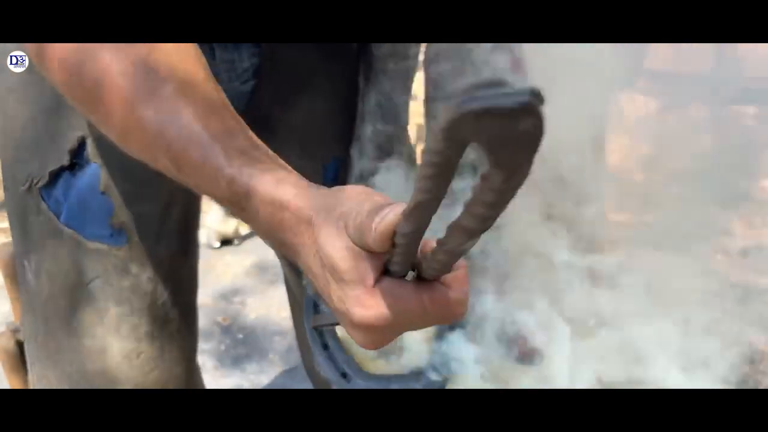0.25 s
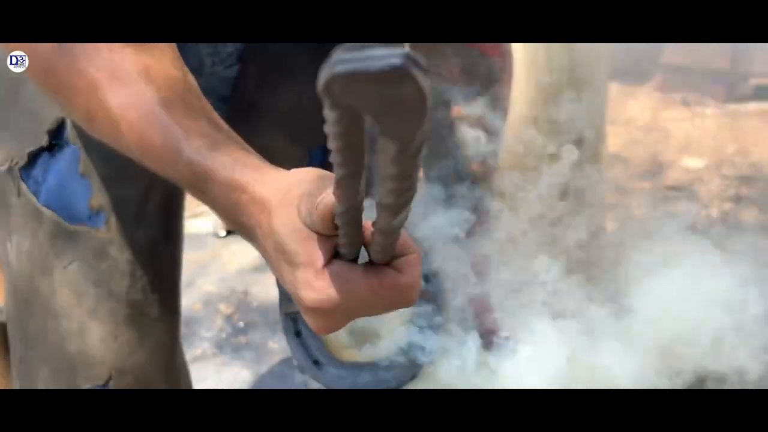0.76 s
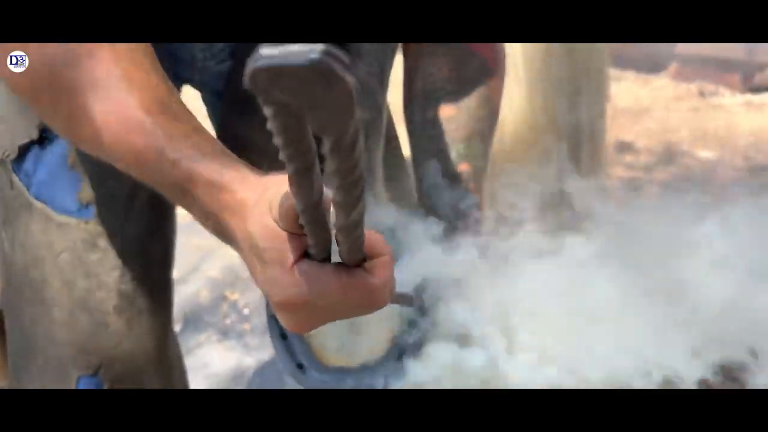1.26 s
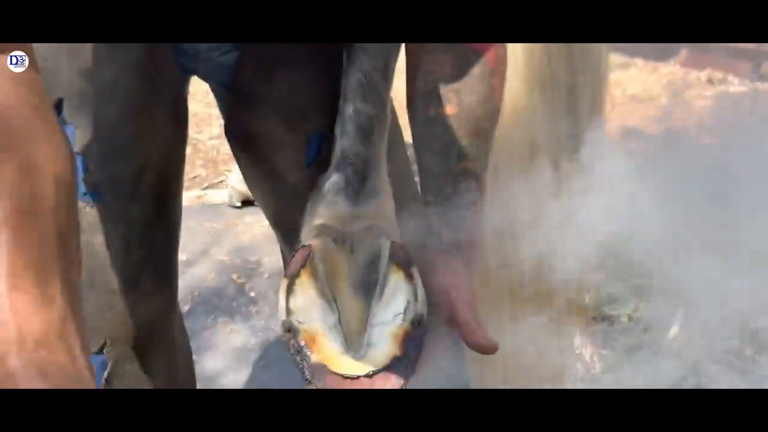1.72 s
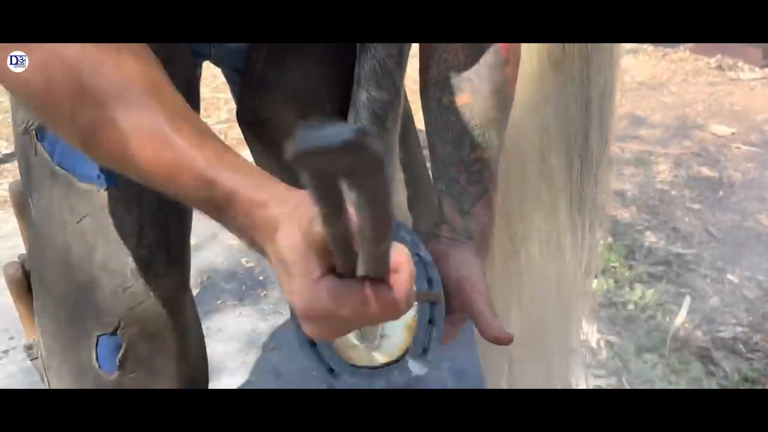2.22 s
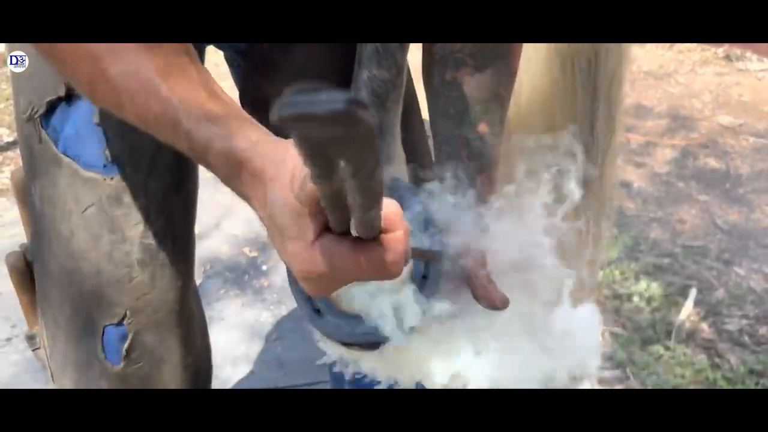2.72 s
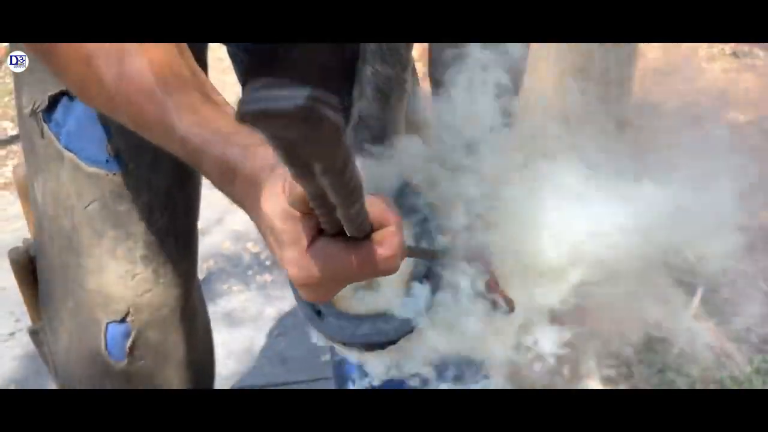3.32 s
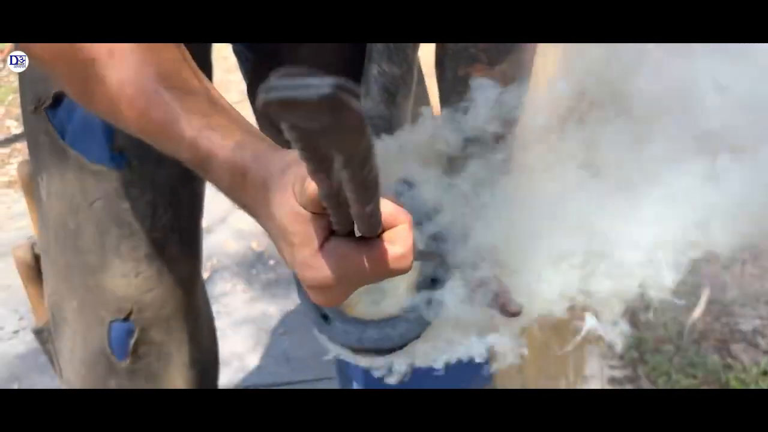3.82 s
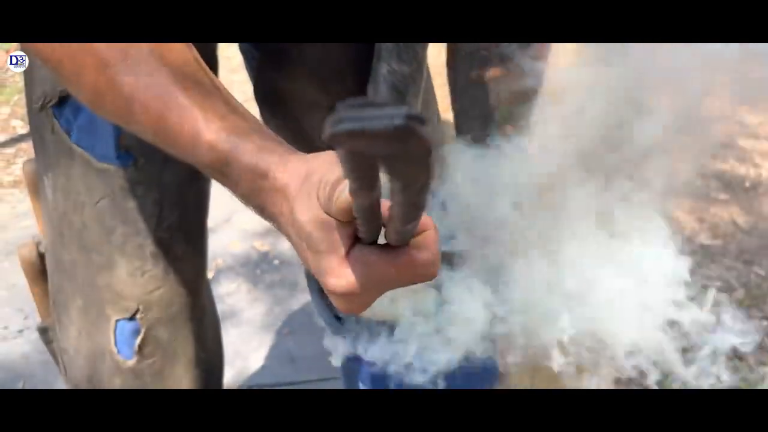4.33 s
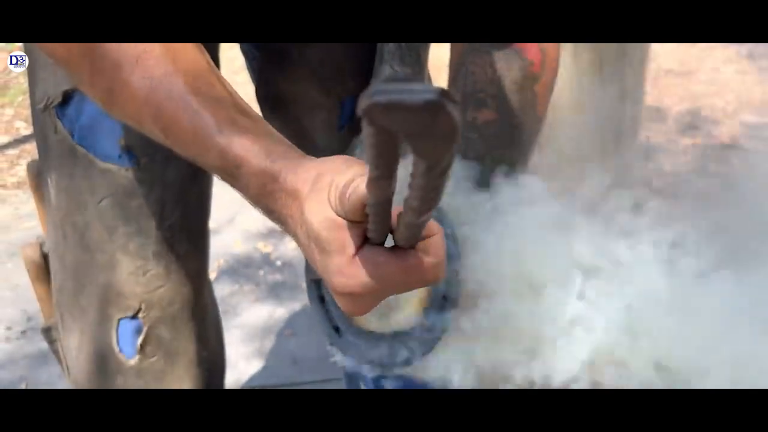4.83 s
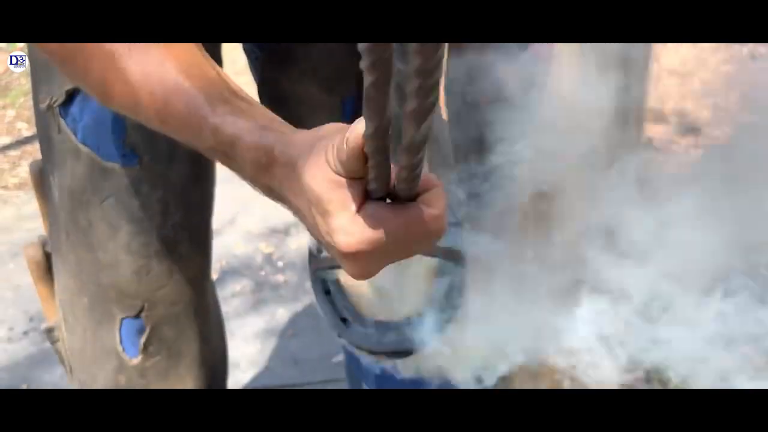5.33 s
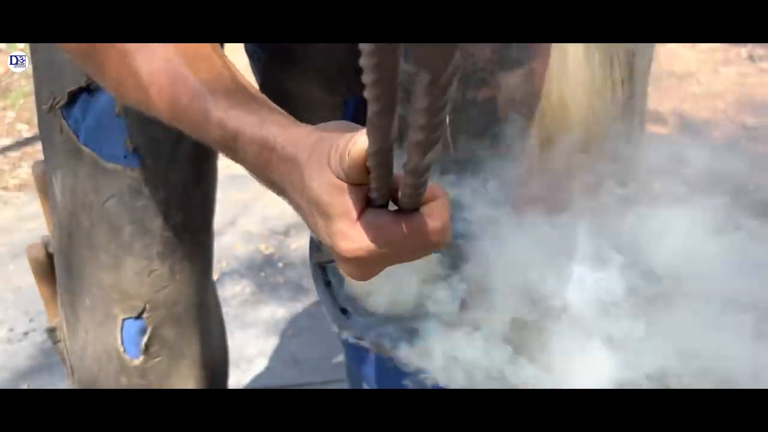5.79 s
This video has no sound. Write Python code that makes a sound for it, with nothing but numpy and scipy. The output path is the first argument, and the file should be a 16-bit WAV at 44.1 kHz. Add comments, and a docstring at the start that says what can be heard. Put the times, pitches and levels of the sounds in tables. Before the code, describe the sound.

A close stereo microphone in an open yard catches a red-hot shoe searing a hoof. First comes a short thud with a faint ring of steel, then a rising, airy sizzle that stops after about a second and a half. Small snaps fill the gap. A second footfall and a hard crack precede a stronger, sustained hiss with occasional pops, fading quickly at the end. A distant engine-like drone wavers quietly below.

```python
"""Outdoors, over a low distant rumble, a horse sets a foot down and a red-hot shoe is pressed on its hoof.
Moisture in the horn boils out in countless tiny random bursts, coloured into a bright hiss and a frying body.
The sizzle swells with contact and thins into single pops, noisy snaps, when the shoe is eased off.
A second, longer press follows, with two more footfalls: falling thuds, gritty scrapes and ringing steel.
The rumble is coloured noise with a wavering two-note drone."""
import sys
import numpy as np
from scipy import signal
from scipy.fft import rfft, irfft, next_fast_len
from scipy.io import wavfile
from scipy.ndimage import uniform_filter1d, map_coordinates

SR = 44100
rng = np.random.default_rng(int(sys.argv[2]) if len(sys.argv) > 2 else 0)


def output_pcm(signal):
    """Save a mono or channel-first signal as 16-bit PCM at the path in sys.argv[1].

    Samples are clipped to [-1, 1] before scaling.
    """
    pcm = np.clip(np.atleast_2d(signal).T, -1, 1) * 32767
    wavfile.write(sys.argv[1], SR, np.round(pcm).astype(np.int16))


N = 267025  # samples

# Colours of the escaping steam and of the frying horn. Each row: frequency in Hz, relative density in dB.
STEAM_COLOUR = [(2000, -40), (5000, -25.5), (6700, -15.5), (7700, -15), (8900, -6), (10000, -5.5),
                (10900, -0.5), (11500, -2), (12200, -11.5), (13200, -13.5), (14600, -36), (15650, -17.5),
                (16000, -60)]
FRYING_COLOUR = [(120, -22), (350, -10), (750, -2.5), (1500, -2.5), (2400, 0.5), (3200, 2), (4200, -1),
                 (5500, 1), (7000, -0.5), (9000, -13), (14000, -39)]
# How the hand covers the shoe. Each row: time in s, delay of the reflection in s,
# signed strength of the reflection (ratio), hollow low-mid boost in dB.
HAND_COVER = [(0.3, .0017, -0.14, 3), (1.0, .0017, -0.37, 4.5), (1.7, 0.0018, -0.017, 0),
              (2.3, 0.0024, 0.34, -0.5), (3.5, 0.002403, 0.37, 2), (5.6, 0.0025, 0.3, 0.5)]
WANDER_DB, WANDER_KNOTS_PER_S = 0.26, 9  # the steam comes unevenly even under a steady hand


def sizzle():
    """Firmer contact boils the horn faster: more bursts, and more escaping steam."""
    steam_db, body_db = searing()
    delay_s, strength, hollow_db = curves(HAND_COVER)
    crackle = bursts(rate_hz=8000 * amp(steam_db - steam_db.max()), scatter_db=4.0)
    sputter_db = 0.45 * wobble(25) + 0.55 * wobble(170)

    steam = coloured(crackle + amp(-1.5) * rng.standard_normal((2, N)), STEAM_COLOUR)
    steam = unit(spread(patchy(steam, depth_db=2.5)))

    body = coloured(crackle + amp(0.5) * rng.standard_normal((2, N)), FRYING_COLOUR)
    # the hand throws back the midrange a moment later and ripples it
    midrange = filtered(body, lambda hz: 1 / (1 + (hz / 2700) ** 4))
    now = np.arange(N)
    reflection = np.array([np.interp(now - delay_s * SR, now, channel) for channel in midrange])
    body = unit(spread(patchy(body + strength * reflection, depth_db=1.35)))
    low_mids = filtered(body, lambda hz: 1 / (1 + (hz / 1400) ** 4))
    body = body + (amp(hollow_db) - 1) * low_mids

    wander_db = WANDER_DB * wobble(WANDER_KNOTS_PER_S)
    return amp(sputter_db) * (amp(steam_db + wander_db) * steam + amp(body_db) * body)


# Presses of the shoe on the horn. Each row: start in s, time to bed in in s, release in s, steam level in dB,
# frying level in dB, growth once bedded in dB/s, steam fade after release in dB/s.
PRESSES = [(0.159, 0.31, 1.645, -39, -48.5, 2.5, 105), (2.045, .52, 5.48, -33, -44, 0, 60.5)]
FLASH_DB, FLASH_S = 2.5, 0.14  # surface moisture flashes off around the moment the shoe is bedded
VENT_DB, VENT_S = 4, 0.035  # trapped steam escapes around the release
IDLE_STEAM_DB, IDLE_BODY_DB = -62.5, -65  # the horn still simmers without pressure
STEAM_RISE_POWER, BODY_RISE_POWER = 0.67, 0.88  # powers of the bedding share: the frying lags
BODY_FADE_SHARE = 0.93  # the frying outlasts the steam


def searing():
    """Steam and frying levels in dB: each press beds in, holds, vents and fades."""
    t = np.arange(N) / SR
    steam, body = amp(IDLE_STEAM_DB), amp(IDLE_BODY_DB)
    for start_s, bed_s, release_s, steam_db, body_db, growth_db_s, fade_db_s in PRESSES:
        contact = np.clip((t - start_s) / bed_s, 0, 1)
        held_s = t - start_s - bed_s
        grown_db = growth_db_s * np.clip(held_s, 0, release_s - start_s)
        faded_db = fade_db_s * np.maximum(t - release_s, 0)
        flash_db = FLASH_DB * np.exp(-np.abs(held_s) / FLASH_S)
        vent_db = VENT_DB * np.exp(-np.abs(t - release_s) / VENT_S)
        steam_press = amp(steam_db + grown_db + flash_db + vent_db - faded_db)
        body_press = amp(body_db + grown_db - BODY_FADE_SHARE * faded_db)
        steam = np.hypot(steam, contact ** STEAM_RISE_POWER * steam_press)
        body = np.hypot(body, contact ** BODY_RISE_POWER * body_press)
    return 20 * np.log10(steam), 20 * np.log10(body)


def bursts(rate_hz, scatter_db):
    """Two streams of tiny random bursts, of steady power whatever the rate."""
    chance = np.clip(rate_hz / SR, 1e-4, 1)
    size = amp(scatter_db * np.clip(rng.standard_normal((2, N)), -2.5, 2.5))
    sign = rng.choice([-1, 1], (2, N))
    fires = rng.random((2, N)) < chance
    return unit(fires * size * sign / np.sqrt(chance))


def patchy(x, depth_db):
    """The colour shifts as the boiling wanders around the shoe."""
    z = signal.stft(x, nperseg=1024)[2]
    field = uniform_filter1d(rng.standard_normal(z.shape[1:]), size=4, axis=0)  # over frequency
    field = uniform_filter1d(field, size=14, axis=1)  # over time
    return signal.istft(z * amp(depth_db * unit(field)), nperseg=1024)[1][:, :N]


# Loudest blisters bursting. Each row: time in s, level over a millisecond in dB, lower crack boost in dB.
POPS = [(0.0298, -23.5, -7), (1.7164, -28, 1), (1.736, -26, 2), (1.812, -21.5, 4), (1.8424, -28, 2),
        (1.897, -36.5, 25), (1.934, -36, 14), (1.9422, -25.5, 9), (1.967, -34.5, 11), (2.0435, -10, -5),
        (2.5127, -19, -8), (2.6788, -22, -5), (4.1613, -16, 0.5), (4.598, -20, 0), (4.9054, -17, -4),
        (5.286, -17.5, -5), (5.4403, -17, -2.5), (5.5503, -24, -5), (5.6037, -17.5, -9),
        (5.6068, -22.5, -3), (5.6304, -22.5, -4), (5.678, -20, -6), (5.7043, -23.5, 2), (5.7232, -20, 6),
        (5.756, -26.5, 2), (5.789, -22.5, -2), (5.8151, -22.5, 6), (5.833, -12.5, -3.5),
        (5.8855, -20.5, -9.5), (5.9238, -17, -4.5), (5.9544, -34, 2), (5.9719, -21.5, -5), (5.992, -32, 6)]
# Colour of a snap. Each row: frequency in Hz, gain in dB.
SNAP_COLOUR = [(150, -35), (500, -18.5), (1200, -14.5), (3000, -10.5), (5000, -8.5), (7500, -8),
               (9000, -1.5), (11000, 2), (12500, -6.5), (14000, -20), (16000, -35)]


def pops():
    """A blister snaps; the horn smears its lower crack, apron and ground scatter it for some milliseconds."""
    out, t = np.zeros((2, N)), np.arange(SR // 20) / SR
    low = lambda hz: 1 / (1 + (hz / 7500) ** 8)
    for s, db, crack_db in POPS + afterpops(count=9):
        smear, scatter = rng.standard_normal((2, 2, len(t)))
        # -60 * t / t60_s: decay by 60 dB in t60_s
        tear = (t == 0) + amp(-15 - 60 * t / 0.0035) * rng.standard_normal(len(t))
        direct = struck(tear / np.linalg.norm(tear), lambda hz: 1 - 0.6 * low(hz))
        smear = struck(smear * amp(-21 - 60 * t / 0.009), low)
        scatter = scatter * (amp(-29.0 - 60 * t / 0.033) + amp(-53 - 60 * t / 0.029))
        snap_gain = lambda hz: amp(along(SNAP_COLOUR, hz) + crack_db * low(hz))
        snap = struck(direct + smear + scatter, snap_gain)
        millisecond_rms = np.sqrt(np.sum(snap ** 2) / 2 / (SR / 1000))
        add(out, s + 0.0003, amp(db) * snap / millisecond_rms)
    return ports(out)


AFTER_DB, AFTER_FALL_DB, AFTER_SCATTER_DB = 3, 17, 3.5  # start over the press's steam level, fall, scatter
AFTER_CRACK_DB = 12  # boost of the lower crack
AFTER_SPAN_DB = 32  # they go on while the release fades the steam this far


def afterpops(count):
    """Small blisters, weaker on average, as each sizzle breaks up: rows as in POPS, count per press."""
    rows = []
    for _, _, release_s, steam_db, _, _, fade_db_s in PRESSES:
        age = (np.arange(count) + rng.random(count)) / count
        scatter_db = AFTER_SCATTER_DB * rng.standard_normal(count)
        db = steam_db + AFTER_DB - AFTER_FALL_DB * age + scatter_db
        times_s = release_s + age * AFTER_SPAN_DB / fade_db_s
        rows += zip(times_s, db, np.full(count, AFTER_CRACK_DB))
    return rows


# Colours of the thud and of the scraped grit. Each row: frequency in Hz, relative level in dB.
THUD_COLOUR = [(30, -56), (60, 8.5), (90, 10), (150, 3.5), (240, 7.5), (450, -0.5), (700, 4.5), (2000, 1.5),
               (6000, -28)]
GRIT_COLOUR = [(150, -39), (600, 3), (1500, -1), (2500, 0.5), (3500, -3), (5000, -6.5), (8000, -9),
               (14000, -22)]
# Steel shoe of the stepping foot. Each row: frequency in Hz, mean level re grit in dB, 60 dB decay in s.
STEEL_MODES = [(2400, -2, 0.041), (4240, -14, 0.058)]


def steps(lag_s):
    """A foot thumps the ground: low tones travel slower, so thuds fall in pitch; grit scrapes, steel rings."""
    out, t = np.zeros((2, N)), np.arange(SR // 8) / SR
    for s, db, bright_hz, note_hz, note_db, grit_db in contacts():
        blow = (t == 0) + amp(-33 - 60 * t / 0.09) * spread(rng.standard_normal((2, len(t))))
        thud_gain = lambda hz: amp(along(THUD_COLOUR, hz)) / np.sqrt(1 + (hz / bright_hz) ** 10)
        thud = struck(blow, thud_gain)
        lag_cycles = lambda hz: lag_s * np.sqrt(1000 * hz / (1 + hz / 4000))
        thud = filtered(thud, lambda hz: np.exp(-2j * np.pi * lag_cycles(hz)))
        hollow_env = amp(note_db - 60 * t / 0.05) * (1 - np.exp(-t / 0.0033))
        hollow = hollow_env * np.sin(2 * np.pi * note_hz * t)
        add(out, s, amp(db) * (thud / np.abs(thud).max() + hollow))

        grit = unit(spread(coloured(rng.standard_normal((2, len(t))), GRIT_COLOUR)))
        grit = grit * amp(-60 * t / 0.064)
        ring = np.zeros(len(t))
        for hz, level_db, t60_s in STEEL_MODES:
            ring += amp(level_db + rng.normal(0, 1.8) - 60 * t / t60_s) * np.sin(2 * np.pi * hz * t)
        add(out, s, amp(grit_db) * (grit + ring))
    return out


# Feet set down; brightness, note, note level and scrape are bases that each part of the footfall modifies.
# Each row: sole time in s, sole level in dB, brightness in Hz, hollow note in Hz, note level re thud in dB,
# toe level in dB, skid delay in s, skid level in dB, gritty scrape in dB, heel delay in s, heel level in dB.
STEPS = [(0.1158, -19, 2820, 870, -8.5, -31.5, 0.025, -29, -28.5, 0.034, -29.5),
         (2.0314, -21.5, 1510, 690, -7.5, -34.5, .0144, -27, -32, 0.037, -28.5),
         (2.5642, -17.5, 1720, 375, -4.5, -48, 0.011, -38, -59, .0488, -33)]
TOE_LEAD_S = 0.0205  # the toe touches before the sole
BRUSH_LEAD_S, BRUSH_DB = 0.0615, -43  # earlier still the foot just brushes the ground
# Parts of a footfall: brightness factor, note factor, note offset in dB, scrape offset in dB.
BRUSH, TOE, SOLE = (0.42, 0.76, -3, -19.5), (0.3, 2, -10, -16), (1, 1, -1, -5.5)
SKID, HEEL = (0.5, 0.96, 5, -0.5), (0.45, 2.5, -10, -35)


def contacts():
    """Each foot rolls down, brush to heel: (s, dB, brightness Hz, note Hz, note dB, scrape dB) per part."""
    rows = []
    for (s, db, bright_hz, note_hz, note_db, toe_db,
         skid_s, skid_db, grit_db, heel_s, heel_db) in STEPS:
        roll = [(-BRUSH_LEAD_S, BRUSH_DB, BRUSH), (-TOE_LEAD_S, toe_db, TOE), (0, db, SOLE),
                (skid_s, skid_db, SKID), (heel_s, heel_db, HEEL)]
        for delay_s, part_db, (bright, note, note_offset_db, scrape_offset_db) in roll:
            rows.append((s + delay_s, part_db, bright * bright_hz, note * note_hz,
                         note_db + note_offset_db, grit_db + scrape_offset_db))
    return rows


# Colour of the rumble. Each row: frequency in Hz, relative density in dB.
RUMBLE_COLOUR = [(20, -34), (30, -15), (43, -4.5), (62, 3.5), (76, -3), (90, -2.5), (125, -8.5),
                 (170, -15.5), (300, -21), (700, -25.5), (1500, -34.5), (3000, -54), (8000, -63),
                 (15000, -102)]
# Far engine. Each row: time in s, low note mean level in dB, upper note level in dB.
DRONE = [(0, -74, -69), (.9, -51, -72), (2.3, -49.5, -60), (3.2, -54.5, -57), (5, -59, -61), (6, -54, -69)]


def yard():
    """Outdoor rumble with a wavering drone, as of a far engine that swells and fades."""
    air = amp(-50.5) * unit(spread(coloured(rng.standard_normal((2, N)), RUMBLE_COLOUR)))
    drone_hz = 61.5 + 0.875 * wobble(2.885)
    turn = 2 * np.pi * np.cumsum(drone_hz) / SR
    low_db, upper_db = curves(DRONE)
    waver_db = 1.5 * wobble(4)
    return air + amp(low_db + waver_db) * np.sin(turn) + amp(upper_db) * np.sin(1.9 * turn)


# Likeness of left and right. Each row: frequency in Hz, correlation (ratio).
ALIKE = [(60, 1), (300, 0.73), (1000, 0.77), (2500, 1), (3100, 0.77), (4600, 0.8), (7400, 0.51),
         (8500, 0.98), (9300, 1), (10200, 0.98), (12000, 0.99), (15000, 1)]


def spread(pair):
    """Two unrelated signals become left and right, correlated by frequency."""
    turn = lambda hz: np.arccos(np.clip(along(ALIKE, hz), -1, 1)) / 2
    mid, side = filtered(pair, lambda hz: np.array([np.cos(turn(hz)), np.sin(turn(hz))]))
    return np.array([mid + side, mid - side])


# Phase between left and right. Each row: frequency in Hz, lead of the left in radians (negative: right leads).
PORT_PHASE = [(2600, 0), (3100, .65), (7500, .8), (8550, 0), (10250, -3.14), (12000, -6.28), (13700, -9.42),
              (15400, -12.5)]


def ports(x):
    """Phase offset of the hoof's treble: left leads in the lower treble, right in the upper."""
    half_lead = lambda hz: 0.5 * along(PORT_PHASE, hz) * np.array([[1], [-1]])
    return filtered(x, lambda hz: np.exp(1j * half_lead(hz)))


def amp(db):
    """Decibels to gain."""
    return 10 ** (np.asarray(db) / 20)


def unit(x):
    """x at rms 1."""
    return x / np.sqrt(np.mean(x ** 2) + 1e-20)


def along(points, hz):
    """(Hz, value) points interpolated on a log frequency axis."""
    f, v = np.transpose(points)
    return np.interp(np.log(hz + 1), np.log(f + 1), v)


def curves(rows):
    """One value per sample for each column after the time."""
    s, *columns = np.transpose(rows)
    return [np.interp(np.arange(N) / SR, s, c) for c in columns]


def wobble(knots_per_s):
    """A smooth random curve through Gaussian knots."""
    knots = rng.standard_normal(int(N * knots_per_s / SR) + 4)
    return map_coordinates(knots, [np.arange(N) * knots_per_s / SR])


def filtered(x, response):
    """x times a complex response of frequency."""
    n = x.shape[-1]
    m = next_fast_len(n + SR // 10)
    return irfft(rfft(x, m) * response(np.fft.rfftfreq(m, 1 / SR)), m)[..., :n]


def coloured(x, spectrum):
    """x shaped by (Hz, dB) points."""
    return filtered(x, lambda hz: amp(along(spectrum, hz)))


def struck(x, gain):
    """x through a causal minimum-phase filter of this gain: nothing sounds before a blow."""
    n = 2 * x.shape[-1]
    cepstrum = irfft(np.log(np.maximum(gain(np.fft.rfftfreq(n, 1 / SR)), 1e-5)))
    cepstrum[1:n // 2] *= 2
    cepstrum[n // 2 + 1:] = 0
    return irfft(rfft(x, n) * np.exp(rfft(cepstrum)))[..., :n // 2]


def add(track, s, sound):
    """Mix a sound into the track at time s."""
    part = track[..., max(round(s * SR), 0):][..., :sound.shape[-1]]
    part += sound[..., :part.shape[-1]]


def scene():
    """Hoof, feet and yard together."""
    return ports(sizzle()) + pops() + steps(lag_s=0.00378) + yard()


TOP_HZ = 16600


def record(dry):
    """Left slightly louder; the sharpest snaps rounded off; nothing kept above TOP_HZ."""
    lean_points = [(100, 0.48), (2000, 0.098), (5000, 0.75), (9000, 0.13)]  # (Hz, dB up left, down right)
    lean_db = lambda hz: along(lean_points, hz) * np.array([[1], [-1]])
    leaning = filtered(dry, lambda hz: amp(lean_db(hz)))
    rounded = leaning / (1 + (leaning / 0.85) ** 6) ** (1 / 6)
    return filtered(rounded, lambda hz: hz < TOP_HZ)


dry = scene()
out = record(dry)
output_pcm(out)
```